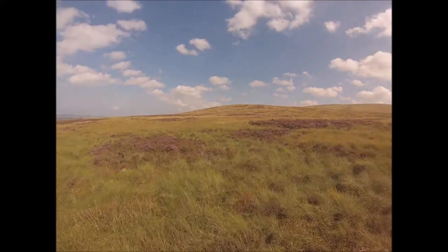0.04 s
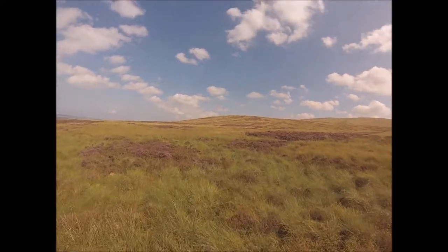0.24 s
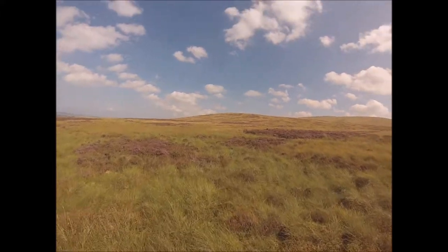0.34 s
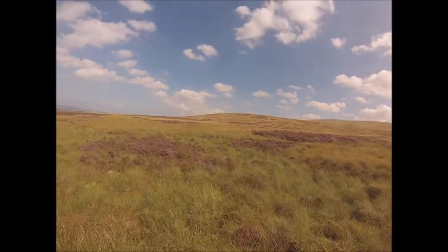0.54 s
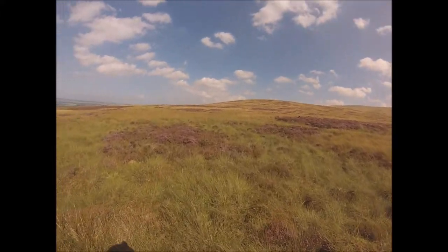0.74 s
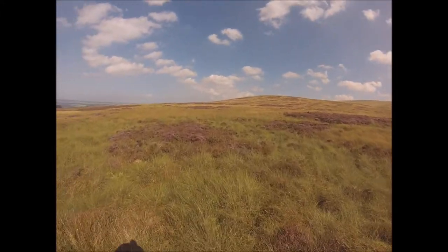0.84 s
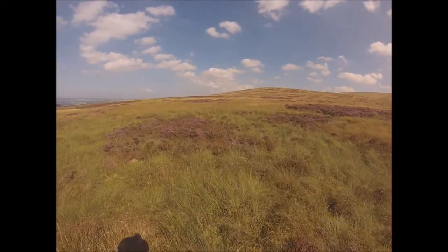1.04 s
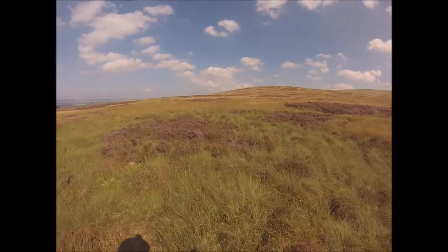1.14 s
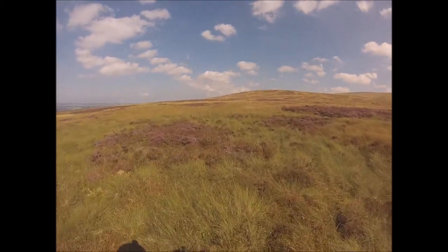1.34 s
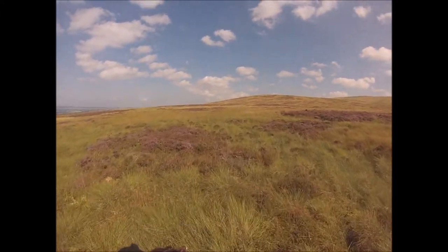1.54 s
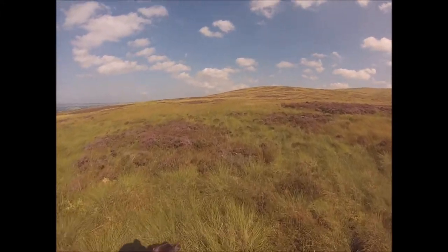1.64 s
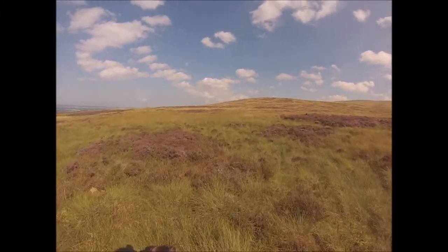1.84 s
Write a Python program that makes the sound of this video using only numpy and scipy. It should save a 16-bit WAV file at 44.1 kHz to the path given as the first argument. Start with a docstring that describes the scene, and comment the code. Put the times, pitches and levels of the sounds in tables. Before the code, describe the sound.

Light wind buffets a hand-held camera's microphone on open grassy moorland. One stronger low thud of air comes early, then softer uneven puffs follow, with very faint hand rubs and a trace of grass rustle over quiet hiss.

```python
"""Light wind on open moorland

Gusts buffet the microphone of a hand-held camera with a deep rumble, each puff at its own pitch and with
a flutter of small eddies. Small rubs of the hand ring the camera's housing by stick-slip friction.
Grass blades collide in a faint rustle over distant air and the steady hiss of the microphone."""
import sys
import numpy as np
from scipy import signal
from scipy.fft import rfft, irfft
from scipy.io import wavfile

SR = 44100
rng = np.random.default_rng(int(sys.argv[2]) if len(sys.argv) > 2 else 0)


def put_to_file(sound):
    """Save the sound as 16-bit audio at rate SR, in the file named by the first command-line argument."""
    columns = np.atleast_2d(sound).T  # one column per channel
    safe = np.clip(columns, -1, 1)
    whole_steps = np.round(safe * 32767)
    wavfile.write(sys.argv[1], SR, whole_steps.astype(np.int16))


N = 83790


def undb(db):
    """Decibel law: amplitude grows tenfold for every 20 dB."""
    return 10 ** (np.asarray(db) / 20)


def unit_rms(x):
    """Normalisation to a mean power of 1."""
    return x / np.sqrt(np.mean(x ** 2))


def colour(x, spectrum):
    """Spectral shaping by (frequency [Hz], gain [dB]) points; the result has rms 1."""
    hz, db = np.array(spectrum).T
    bins_hz = np.maximum(np.fft.rfftfreq(N, 1 / SR), 1)
    gain = undb(np.interp(np.log(bins_hz), np.log(hz), db))
    return unit_rms(irfft(rfft(x) * gain, N))


def noise(spectrum):
    """Filtered Gaussian noise of rms 1."""
    return colour(rng.standard_normal(N), spectrum)


def drift(hz):
    """Low-pass noise: a random wander slower than the given frequency."""
    return noise([(hz / 2, 0), (hz, -20), (2 * hz, -100)])


def impulses(per_s, spread_db):
    """Shot noise: independent clicks of random sign and log-normal size."""
    occurs = rng.random(N) < per_s / SR
    return occurs * rng.choice([-1, 1], N) * undb(spread_db * rng.standard_normal(N))


def swells(t, rows):
    """Gaussian envelopes, added in power; rows are (centre time [s], duration [s], level [dB])."""
    return np.sqrt(sum(undb(db) ** 2 * np.exp(-(2 * (t - at) / length) ** 2) for at, length, db in rows))


def distant_air(t):
    """Aerodynamic noise: air moving far away gives a low rush that swells gently."""
    # spectrum of the rush (frequency [Hz], relative density [dB])
    spectrum = [(30, -6), (100, 0), (200, 0), (300, -0.5), (420, -3.5), (650, -8), (1100, -13),
                (2000, -22.5), (5000, -40)]
    # its rise and fall (time [s], relative level [dB])
    swell = [(0, -2), (.2, 1), (.32, 1), (.44, -0.5), (.54, 1.5), (.63, 1.5), (.93, -1), (1.06, 0),
             (1.17, 1.5), (1.29, -1), (1.37, 3), (1.48, 1.5), (1.6, 1.5), (1.65, 1.5), (1.71, 3), (1.8, -1),
             (1.9, 0)]
    swell_db = np.interp(t, *np.array(swell).T)
    return noise(spectrum) * undb(-83 + swell_db)


def microphone_hiss():
    """Self-noise: the microphone adds a stationary broadband hiss."""
    # spectrum of the hiss (frequency [Hz], relative density [dB])
    spectrum = [(100, 0.5), (1000, 2), (2500, -0.5), (4000, -2.5), (6300, -4), (9000, -5.5), (11000, -5.5),
                (13000, -7)]
    return noise(spectrum) * undb(-82)


def turbulence(spectrum, steadiness):
    """Turbulent pressure swings with a random period; steadiness (0-1) flattens its envelope."""
    analytic = signal.hilbert(noise(spectrum))
    envelope = np.sqrt(np.abs(analytic) ** 2 + 0.1)
    return unit_rms(analytic.real / envelope ** steadiness)


def breeze():
    """Steady turbulent flow over the microphone makes a very deep rumble."""
    # spectrum of the rumble (frequency [Hz], relative density [dB])
    spectrum = [(10, -15.5), (26, 2.5), (45, -3.5), (65, -8.5), (90, -25), (200, -54.5), (800, -120)]
    return turbulence(spectrum, steadiness=0.6) * undb(-69.5)


def buffeting(rate_hz, waver=0.14, bend_rad=0.12):
    """Quasi-periodic pressure: the rate wavers, and phase distortion bends the sine towards a triangle."""
    wavering_hz = rate_hz * (1 + waver * drift(hz=60))
    phase = 2 * np.pi * (rng.random() + np.cumsum(wavering_hz) / SR)
    return np.sqrt(2) * np.sin(phase - bend_rad * np.sin(2 * phase))


def gusts(t):
    """Eddy shedding: each puff buffets the microphone and sheds smaller eddies around its peak."""
    # puffs of wind (centre time [s], duration [s], relative buffeting level [dB],
    # buffeting rate [Hz], relative eddy level [dB])
    puffs = [(0.065, 0.0353, -60.5, 49.3, -71.5), (0.164, 0.081, -55.5, 26.1, -77),
             (0.219, 0.0517, -52.5, 31.56, -76.5), (0.3, 0.0557, -33, 27, -57.5),
             (0.412, .05, -56.5, 43, -85), (0.527, 0.1105, -61, 23, -73.5), (0.653, 0.062, -60, 25.8, -79),
             (0.783, 0.0468, -56, 27.9, -92), (0.879, 0.0644, -52.5, 29.1, -82.5),
             (0.937, 0.0533, -63, 75.3, -80.5), (0.975, 0.0406, -53, 22, -80.5),
             (1.028, 0.0473, -57, 50, -80.5), (1.065, 0.0734, -48.5, 28.6, -82),
             (1.131, 0.0187, -66, 43.7, -83), (1.23, .09, -68, 24, -79), (1.348, 0.0458, -61, 32.2, -76),
             (1.464, 0.114, -57, 20.07, -78.5), (1.517, 0.0287, -50.5, 42.1, -77.5),
             (1.605, 0.0692, -48, 33, -73.5), (1.644, .04, -61, 47, -80), (1.696, .06, -51.5, 19.72, -80.5),
             (1.878, 0.0244, -63, 32, -77.5)]
    # pressure spectrum of the small eddies (frequency [Hz], relative density [dB])
    eddy_spectrum = [(40, -15), (60, 0.5), (82, -8), (108, -9), (160, -15.5), (250, -34), (600, -62),
                     (2000, -120)]
    buffet_db, eddy_db, eddy_span = -1, -2, 0.75  # eddies last for this share of their puff
    buffets = sum(buffeting(hz) * swells(t, [(at, length, db)]) for at, length, db, hz, _ in puffs)
    shedding = swells(t, [(at, length * eddy_span, db) for at, length, _, _, db in puffs])
    eddies = turbulence(eddy_spectrum, steadiness=0.88) * shedding
    return buffets * undb(buffet_db) + eddies * undb(eddy_db)


def housing_friction(t, force, tilt_db):
    """Stick-slip friction of skin excites the housing's damped modes, tilted by tilt_db per octave."""
    # modes of the housing (frequency [Hz], bandwidth [Hz], relative level [dB])
    modes = [(1436, 170, -3.5), (1678.3, 150, -6.5), (1999, 260, -1), (2179, 200, -1), (2429.3, 240, -7)]
    age = t[:N // 32]
    ring = np.zeros_like(age)
    for k, (hz, bandwidth, db) in enumerate(modes):
        amplitude = (-1) ** k * undb(db + tilt_db * np.log2(hz)) * np.sqrt(bandwidth)
        ring += amplitude * np.exp(-np.pi * bandwidth * age) * np.sin(2 * np.pi * hz * age)
    slips = unit_rms(impulses(per_s=3000, spread_db=2))
    return signal.oaconvolve(slips * force, ring / np.linalg.norm(ring))[:N]


def handling(t):
    """Structure-borne sound: the grip rubs the housing lightly all the time, with short stronger rubs."""
    # rubs of the hand (centre time [s], duration [s], relative level [dB], brightness [dB/octave])
    rubs = [(0.264, 0.0156, -81.5, 8), (0.293, 0.014, -77.5, -3), (0.346, 0.0204, -81.5, 13.5),
            (0.471, 0.0163, -85.5, 15.5), (0.622, 0.0158, -81, 1), (1.024, 0.0228, -81.5, 6.5),
            (1.071, 0.0166, -81.5, 15.5), (1.2, 0.0163, -81, 15.5), (1.257, 0.0454, -86.5, -2.5),
            (1.561, 0.037, -83, -1.5), (1.647, 0.0288, -77.5, 3.5), (1.694, 0.0282, -76, 0),
            (1.725, 0.0144, -76.5, 2), (1.772, .05, -85.5, 2)]
    grip_db, rub_db = -92.5, -1.5
    sound = housing_friction(t, undb(grip_db), tilt_db=-3)
    for at, length, db, tilt_db in rubs:
        force = swells(t, [(at, length, db + rub_db)])
        sound += housing_friction(t, force, tilt_db)
    return sound


def grass(t):
    """Superposed impacts: dry blades tick against each other so densely that they merge into swishes."""
    # spectrum of the ticks (frequency [Hz], relative density [dB])
    spectrum = [(1200, -28), (3200, 1), (5000, -5.5), (9000, -8), (13000, -8)]
    # swishes of the grass (centre time [s], duration [s], level [dB])
    swishes = [(1.437, 0.072, -90.5), (1.515, 0.059, -87), (1.587, .03, -83), (1.683, 0.098, -90)]
    ticks = impulses(per_s=2700, spread_db=3)
    return colour(ticks, spectrum) * swells(t, swishes)


def scene():
    """Linear superposition: all sources add in one channel."""
    t = np.arange(N) / SR
    return (distant_air(t) + microphone_hiss() + breeze() + gusts(t) + handling(t) + grass(t))[None]


def record(dry):
    """Band limiting: the camera's steep low-pass filter cuts the top of the treble."""
    cutoff_hz = 12850
    return signal.sosfilt(signal.ellip(10, .2, 70, cutoff_hz, fs=SR, output="sos"), dry)


dry = scene()
out = record(dry)
put_to_file(out)
```